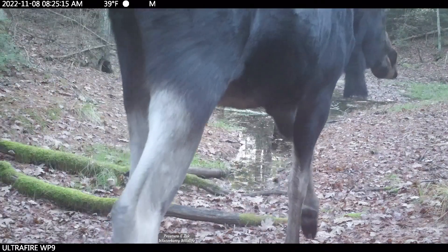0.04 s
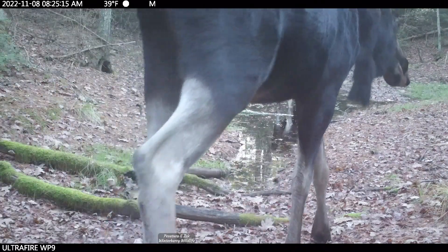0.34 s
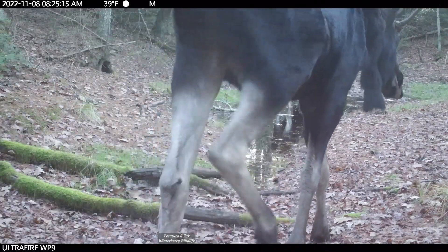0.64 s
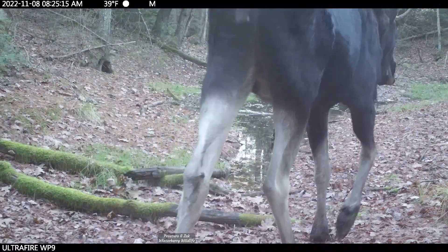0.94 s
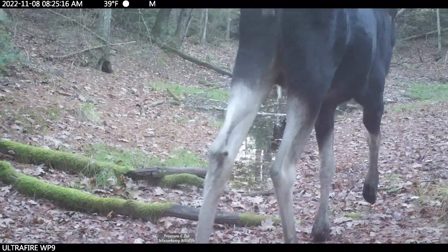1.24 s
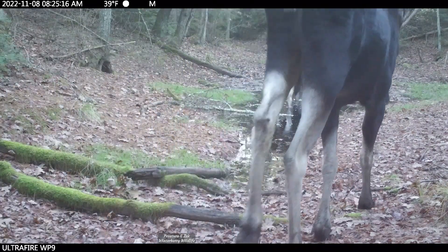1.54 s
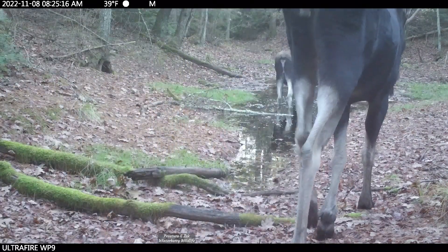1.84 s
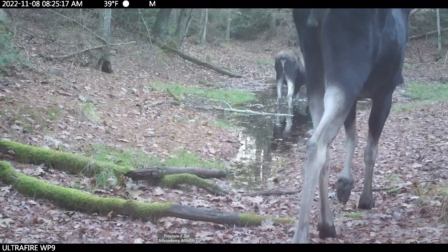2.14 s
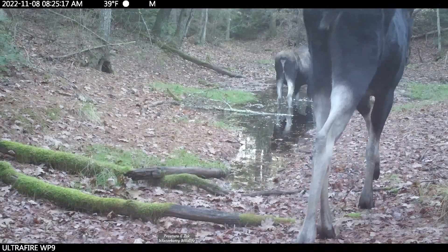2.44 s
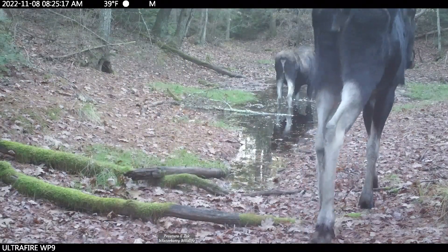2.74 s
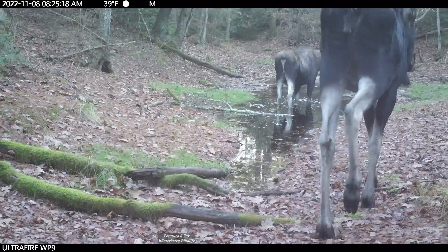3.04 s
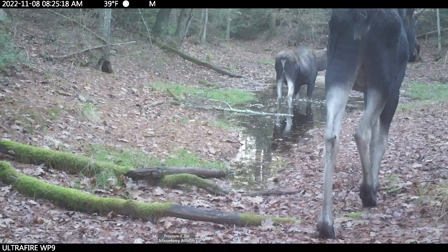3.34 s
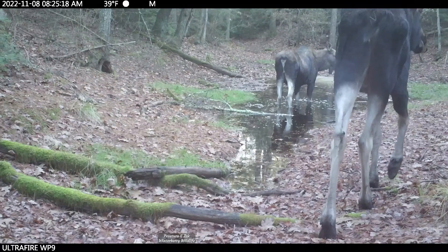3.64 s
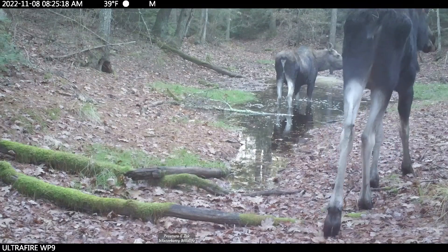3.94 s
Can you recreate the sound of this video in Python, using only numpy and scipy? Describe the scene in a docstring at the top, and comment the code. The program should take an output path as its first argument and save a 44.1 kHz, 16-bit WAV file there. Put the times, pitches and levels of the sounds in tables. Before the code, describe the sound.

A moose moans briefly, then hooves crunch through dry leaves and snap twigs, moving away from the microphone. A longer nasal moan follows and cracks lower as it dies, over faint hiss and rumble in a forest.

```python
"""On a forest floor, a moose walks away from a trail camera through dry leaf litter.
One moan is ending at the start; a long one follows, opening from a closed-mouth hum into a nasal whine
and cracking down an octave as it dies. Its harmonics are shaped by throat, mouth and nose resonances.
Hooves crush leaves and snap twigs: each fracture is an impulse that rings the microphone in the treble.
Faint hiss and rumble lie underneath."""
import sys
import numpy as np
from scipy import signal
from scipy.fft import rfft, irfft, next_fast_len
from scipy.io import wavfile
from scipy.ndimage import uniform_filter1d, map_coordinates

SR = 44100
rng = np.random.default_rng(int(sys.argv[2]) if len(sys.argv) > 2 else 0)


def digitize_waveform(pressure):
    """Quantize a signal to 16-bit integers and store it at the path in sys.argv[1].

    Rows of a 2-D input are taken as channels; values are limited to [-1, 1].
    """
    field = np.atleast_2d(pressure).T
    bounded = np.clip(field, -1, 1)
    quanta = np.round(bounded * 32767).astype(np.int16)
    wavfile.write(sys.argv[1], SR, quanta)


N = 176400
TIME = np.arange(N) / SR

# Moans: t/s, pitch/Hz, fundamental/dB, overtones/dB, mouth resonance/Hz, rasp re overtones/dB
FIRST_MOAN = [(0, 300.5, -39, -75, 760, -24), (.04, 286, -37.5, -55, 736, -20),
              (.07, 274.6, -47.5, -51, 855, -19), (.125, 263, -42, -40, 950, -12),
              (.2, 251.5, -45.5, -43, 940, -24), (.228, 232, -45, -54, 920, -18),
              (.243, 234, -49, -52, 920, 6), (.249, 177.5, -47, -52, 900, 2.5),
              (.278, 139, -41.5, -55, 900, -5), (.303, 128.5, -48.5, -51, 900, -3),
              (.33, 120, -75, -77, 900, -8)]
LONG_MOAN = [(2.66, 420, -80, -85, 750, -16), (2.72, 385.5, -48, -69, 750, -22),
             (2.78, 347.5, -43, -51, 800, -28), (2.86, 321.5, -34, -53, 750, -22),
             (2.93, 313.3, -30, -62, 740, -22), (3.00, 320, -30, -56, 720, -17),
             (3.029, 316, -29, -53, 720, -28), (3.038, 341.7, -30.5, -49, 766, -13),
             (3.056, 323.7, -37.5, -43.5, 790, -15), (3.13, 346, -36, -39, 825, -27),
             (3.25, 344, -35, -37.5, 865, -30), (3.30, 331.6, -35.5, -38, 777, -14),
             (3.345, 316.8, -32.5, -40, 830, -11), (3.425, 324.4, -33.5, -36.5, 778, -19),
             (3.505, 314.5, -32.5, -41, 835, -14), (3.56, 295.4, -29, -38, 895, -10.5),
             (3.586, 301, -29.5, -38, 930, -12), (3.599, 286.7, -30.5, -38, 940, -10),
             (3.63, 298.4, -31, -34.5, 964, -17), (3.69, 282.3, -34, -39, 1015, -9),
             (3.748, 268.2, -38.5, -42.5, 990, -10), (3.762, 158.3, -44.5, -49, 930, -3),
             (3.805, 133, -41.5, -56, 886, 2), (3.83, 125.3, -57, -60, 900, 2)]
# Strength of the nose resonance: t/s, level/dB
NOSE_LEVEL = [(3.02, -5.5), (3.15, 2), (3.23, -7), (3.34, -5), (3.43, -10.5), (3.57, -7), (3.65, -14),
              (3.72, -11)]
# Background spectra: f/Hz, relative level/dB
HISS_SPECTRUM = [(170, -64), (235, -6), (320, -5), (1300, -6), (2000, -10), (3500, -13.5),
                 (4700, -9.5), (6300, -8.5), (8000, -9), (10000, -16), (15000, -22)]
RUMBLE_SPECTRUM = [(4, -5), (12, -20.5), (25, -18), (60, -21.5), (100, -28), (140, -37.5),
                   (200, -42.5), (600, -75), (2000, -100)]
# Their stereo widths: f/Hz, side re mid/dB
HISS_WIDTH = [(200, -1.5), (2000, -17), (5000, 3.5), (14000, 2)]
RUMBLE_WIDTH = [(25, -4.5), (70, -7.5), (150, -23)]
# Leaves settling between steps: t/s, level/dB
SETTLING = [(0, -39), (.55, -37), (1.0, -43), (1.2, -45), (1.68, -42), (1.8, -45.5), (2.35, -52),
            (2.95, -43), (3.25, -58.5), (4, -48)]
# Hooves pressing and dragging: t/s, hold/s, rise/s, fall/s, level/dB, crunch gain/dB, fizz gain/dB
HOOF_STEPS = [(0.112, 0.0039, .0005, 0.018, -31.5, 6.5, -12), (0.235, 0.061, 0.059, 0.028, -35, 6, 8),
              (0.312, 0.017, 0.026, 0.047, -22.5, 0, 2.5), (0.366, 0.042, 0.027, 0.022, -19, -1.5, 3),
              (0.438, 0.0089, 0.019, 0.05, -20.5, -1.5, 0.5), (0.588, 0.024, 0.022, 0.013, -33, -0.5, 1),
              (0.641, 0.023, 0.0079, 0.043, -30.5, 0.5, 1), (0.799, 0.036, .025, .03, -34, 3, 4),
              (0.862, 0.043, 0.022, 0.032, -31.5, 3.5, 0), (1.298, 0.11, 0.12, 0.036, -30, 0.5, 0.5),
              (1.385, 0.061, 0.042, 0.063, -21, 0.5, 1.5), (1.57, 0.017, 0.017, 0.15, -43.5, 5.5, -6),
              (1.979, 0.022, 0.022, 0.062, -38.5, 6.5, 2), (2.013, 0.012, 0.0047, 0.0058, -27.5, -5, -13),
              (2.057, 0.034, 0.017, 0.037, -39.5, 4, 7), (2.157, 0.032, 0.022, 0.073, -43.5, 6, 1.5),
              (2.666, 0.034, 0.04, 0.041, -39.5, 4, 4), (2.773, 0.098, 0.048, 0.035, -30, 0.5, 2.5),
              (3.017, 0.005, 0.0045, 0.0095, -41.5, 8, 5), (3.439, 0.011, 0.049, 0.0098, -47.5, 9, -3),
              (3.48, 0.01, 0.012, 0.045, -38.5, 1, -13), (3.871, 0.052, 0.0021, 0.047, -32.5, 2, 5.5)]
# Twigs breaking: t/s, snap level/dB, ring level/dB, ring f/Hz
TWIGS = [(0.1128, -12, -31, 1300), (0.1142, -7, -24, 1320), (0.1195, -6, -30, 1280), (.442, -18, -26, 2600),
         (0.5925, -11, -34, 2370), (0.902, -12, -24.5, 2650), (1.0591, -14, -33, 2660),
         (1.064, -25, -32.5, 2550), (1.7785, -21, -43, 2490), (1.906, -31, -40, 3000),
         (1.9505, -21.5, -43, 2300), (3.02, -34, -40, 2720), (3.429, -25, -38, 1480)]
# Leaf ribs breaking: t/s, level/dB
RIB_SNAPS = [(0.1276, -17), (0.18, -14), (0.313, -6), (0.321, -4), (0.677, -10), (0.683, -4.5),
             (0.718, -14), (1.016, -28), (1.303, -12), (1.348, -24), (1.425, -12), (1.465, -14),
             (1.4868, -5), (1.5533, -6), (1.558, -8), (1.636, -14.5), (1.8206, -8.5), (2.0225, -13),
             (2.065, -15), (2.222, -19.5), (2.4402, -18.5), (2.638, -23), (3.1237, -25.5), (3.177, -23),
             (3.7083, -21.5), (3.8683, -21)]
# Spectrum of one fracture, with the microphone's treble peak: f/Hz, level/dB
FRACTURE_SPECTRUM = [(120, -54), (200, -31.5), (330, -21.5), (600, -28), (850, -27.5), (1400, -19),
                     (2100, -21), (2500, -15), (3600, -17), (4800, -12.5), (5600, -6.5), (6250, 0.5),
                     (6750, -1.5), (7500, -7.5), (9000, -14), (11500, -19), (15000, -27.5)]
# Response of the left microphone port: f/Hz, left re right/dB
LEFT_PORT = [(2400, -2.8), (4600, 1), (6500, 0), (9000, -2.5), (15000, -2.5)]

FOREST_T60_S, TWIG_T60_S = 0.11, 0.0093
CRACK_BELOW_HZ = 240  # the voice breaks under this pitch


def undb(db):
    """Amplitude ratio for a level in decibels."""
    return 10 ** (np.asarray(db) / 20)


def unit(x):
    """Normalisation to an rms of 1."""
    return x / np.sqrt(np.mean(x ** 2))


def wander(hz):
    """Random modulation: linear interpolation of hz draws a second, rms 1."""
    return unit(np.interp(TIME * hz, np.arange(4000), rng.standard_normal(4000)))


def colour(x, points):
    """Minimum-phase filtering through (f/Hz, level/dB) points."""
    hz, db = np.array(points, float).T
    size = next_fast_len(N + 8192, real=True)
    f = np.maximum(np.fft.rfftfreq(size, 1 / SR), 1)
    gain = undb(np.interp(np.log(f), np.log(hz), db))
    cepstrum = irfft(np.log(gain), size)
    cepstrum[1:size // 2] *= 2  # folding makes the response causal
    cepstrum[size // 2 + 1:] = 0
    return irfft(rfft(x, size) * np.exp(rfft(cepstrum)), size)[..., :N]


def below(x, hz):
    """Zero-phase low-pass filtering."""
    return signal.sosfiltfilt(signal.butter(2, hz, fs=SR, output="sos"), x)


def resonance(hz, centre_hz, q):
    """Squared magnitude response of a damped resonator, 1 at its centre."""
    return 1 / (1 + (q * (hz / centre_hz - centre_hz / hz)) ** 2)


def place(x, lag_ms, pan_db=0):
    """Path difference: sound from the right reaches the left port later."""
    late = map_coordinates(x, [np.arange(N) - lag_ms * SR / 1000], order=5, mode="nearest")
    return np.array([late * undb(pan_db / 2), x * undb(-pan_db / 2)])


def forest_echoes(x):
    """Diffuse reverberation: reflections decay exponentially, uncorrelated at the two ports."""
    tail = rng.standard_normal((2, SR)) * np.exp(-np.log(1000) * TIME[:SR] / FOREST_T60_S)
    tail /= np.linalg.norm(tail, axis=1, keepdims=True)
    return signal.fftconvolve(x[None], tail, axes=1)[:, :N]


def moan(table, mouth_q):
    """Source and filter: tract resonances weight the harmonics; random modulation makes them rasp."""
    times, *columns = np.array(table, float).T
    contours = (uniform_filter1d(np.interp(TIME, times, c), size=200) for c in columns)
    pitch, hum_db, overtone_db, mouth_hz, rasp_db = contours
    nose_gain = undb(np.interp(TIME, *np.array(NOSE_LEVEL).T))
    cracked = np.clip((CRACK_BELOW_HZ - pitch) / 30, 0, 1)
    jitter = .0045 * wander(70) + (.022 * undb(rasp_db) + .07 * cracked) * wander(250)
    phase = 2 * np.pi * np.cumsum(pitch * (1 + jitter)) / SR
    hum = undb(hum_db + .7 * wander(50) + 2.5 * cracked * wander(200))  # shimmer and creak
    chest = cracked * undb(2) * resonance(2 * pitch * (1 + jitter), centre_hz=353, q=3.3)
    voice = hum * (np.sin(phase) + chest * np.sin(2 * phase))
    for k in range(2, 13):
        hz = k * pitch * (1 + jitter)
        throat = undb(-18) * resonance(hz, centre_hz=475, q=2.1)
        mouth = resonance(hz, mouth_hz, mouth_q)
        nose = nose_gain * resonance(hz, centre_hz=1970, q=7.8)
        source = undb(overtone_db - 7 * np.log2(k / 2) + 1.2 * wander(35))  # falls 7 dB an octave
        sidebands = wander(160) * np.sin(k * phase) + wander(160) * np.cos(k * phase)
        rasp = undb(rasp_db) * np.sqrt(k / 2) * sidebands
        voice += (throat + mouth + nose) * source * (np.sin(k * phase) + rasp)
    return np.sqrt(2) * voice * (TIME <= times[-1])


def background_noise(spectrum, width, db):
    """Partial coherence: independent mid and side noises give hiss or rumble its breadth."""
    mid, side = (unit(colour(rng.standard_normal(N), spectrum)) for _ in range(2))
    return undb(db) * (mid + colour(side, width) * np.array([[1], [-1]]))


def crackles(per_s, spread_db):
    """Shot noise: dry leaves fracture at random instants, mostly in small breaks; rms 1."""
    sizes = undb(spread_db * np.minimum(rng.exponential(size=N), 2.2))
    breaks = rng.random(N) < per_s / SR
    return unit(breaks * sizes * np.sign(rng.standard_normal(N)))


def settling_leaves():
    """Modulated shot noise: the litter settles, fainter as the animal leaves."""
    return crackles(per_s=2000, spread_db=6) * undb(np.interp(TIME, *np.array(SETTLING).T))


def hoof_steps():
    """Incoherent addition: steps sum in power, driving clumped crackles for crisp, crunch and fizz."""
    power = np.zeros((3, N))
    for start, hold, rise, fall, db, crunch_db, fizz_db in HOOF_STEPS:
        before, after = np.maximum(start - TIME, 0), np.maximum(TIME - start - hold, 0)
        press = undb(db) * np.exp(-before / rise - after / fall)
        power += np.outer(undb([0, crunch_db, fizz_db]), press) ** 2
    flicker = np.array([unit(undb(1.8 * wander(140))) for _ in power])
    shower = crackles(per_s=6000, spread_db=1.5) * unit(undb(wander(168.7)))
    return shower * flicker * np.sqrt(power)


def twig_rings():
    """Free vibration: each broken twig rings in one damped mode."""
    wood = np.zeros(N)
    for start, _, ring_db, hz in TWIGS:
        age = np.maximum(TIME - start, 0)
        decay = np.exp(-np.minimum(np.log(1000) * age / TWIG_T60_S, 20))
        wood += undb(ring_db) * np.sin(2 * np.pi * hz * age) * decay
    return wood


def snaps(table):
    """Brittle fracture: each twig or leaf rib gives way in a single impulse."""
    impulses = np.zeros(N)
    for start, db, *_ in table:
        impulses[int(start * SR)] += undb(db)
    return impulses


def leaf_scatter(clicks, smear_s=0.0047, above_hz=7940):
    """Scattering: nearby leaves smear each click into a brief fizz, different at each port."""
    pole = np.exp(-1 / (smear_s * SR))
    envelope = np.sqrt(signal.lfilter([1 - pole], [1, -pole], clicks ** 2))
    fizz = colour(envelope * rng.standard_normal((2, N)), FRACTURE_SPECTRUM)
    return signal.sosfilt(signal.butter(2, above_hz, "high", fs=SR, output="sos"), fizz)


def leaf_litter():
    """Convolution: all fractures share one impulse response, ringing at the microphone's treble peak."""
    response = colour(signal.unit_impulse(N), FRACTURE_SPECTRUM)
    crisp, crunch, fizz = (settling_leaves() + hoof_steps()) / np.linalg.norm(response)
    twigs, ribs = np.array([snaps(TWIGS), snaps(RIB_SNAPS)]) / np.max(np.abs(response))
    crunch += undb(-9) * twigs + undb(-12.5) * ribs
    # Crossovers: fizz on top, crisp in the middle, crunch at the bottom.
    clicks = fizz + below(crisp - fizz, hz=9800) + below(twigs + ribs, hz=8650)
    fractures = clicks + below(crunch - clicks, hz=5000)
    sound = colour(fractures, FRACTURE_SPECTRUM) + twig_rings()
    direct = place(sound, lag_ms=-0.022 + 0.018 * TIME, pan_db=0.3)  # drifts to the right
    left, right = direct + undb(-1.5) * leaf_scatter(clicks) + undb(-56) * forest_echoes(sound)
    return np.array([colour(left, LEFT_PORT), right])


def scene():
    """Superposition: moans and footsteps among the trees add to hiss and fluttering rumble."""
    voice = moan(FIRST_MOAN, mouth_q=4.5) + moan(LONG_MOAN, mouth_q=2.56)
    moans = place(voice, lag_ms=0.039) + undb(-11) * forest_echoes(voice)
    litter = leaf_litter()
    hiss = background_noise(HISS_SPECTRUM, HISS_WIDTH, db=-55.5)
    rumble = background_noise(RUMBLE_SPECTRUM, RUMBLE_WIDTH, db=-46) * undb(0.5 * wander(21))
    return moans + litter + hiss + rumble


def record(dry):
    """Band limiting and bias: the camera cuts the top and adds a constant offset to each channel."""
    low_pass = signal.ellip(8, .2, 70, 15200, fs=SR, output="sos")
    return signal.sosfilt(low_pass, dry) + np.array([[-.046], [-.023]])


dry = scene()
out = record(dry)
digitize_waveform(out)
```